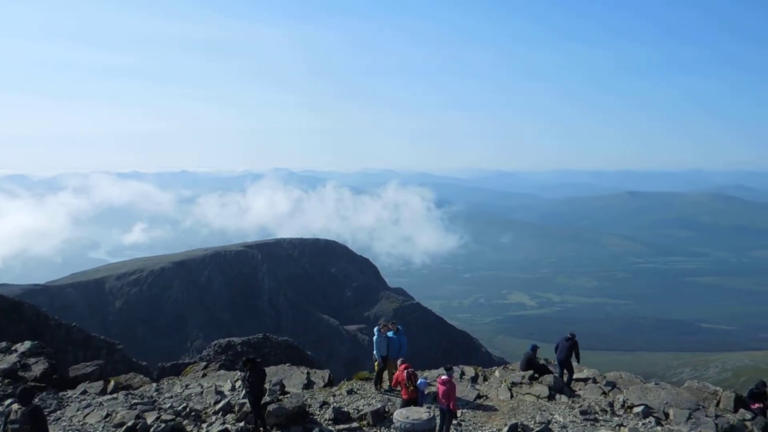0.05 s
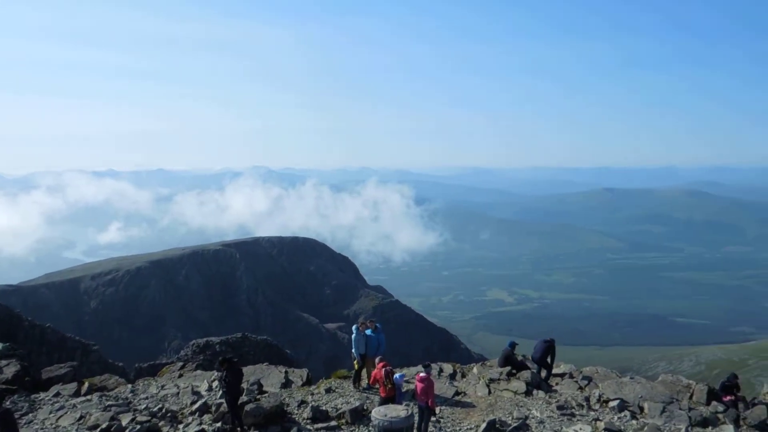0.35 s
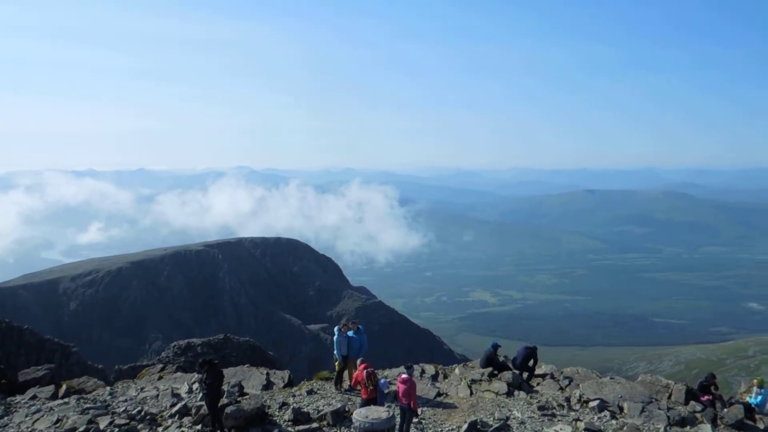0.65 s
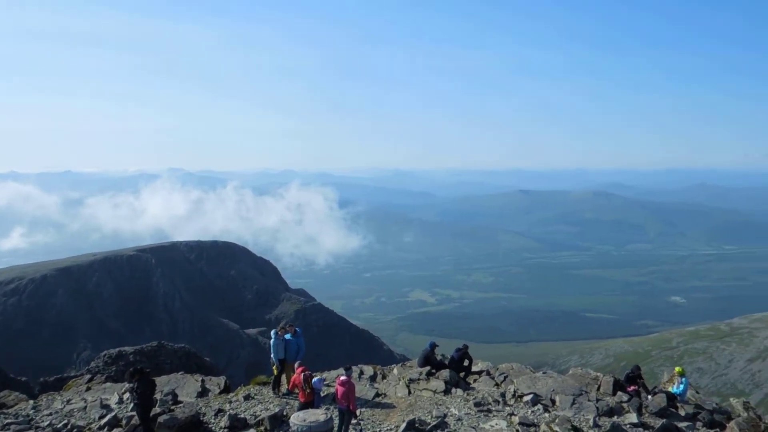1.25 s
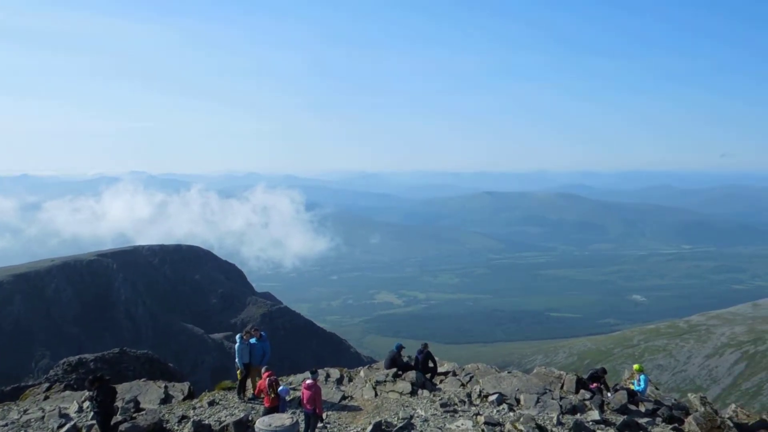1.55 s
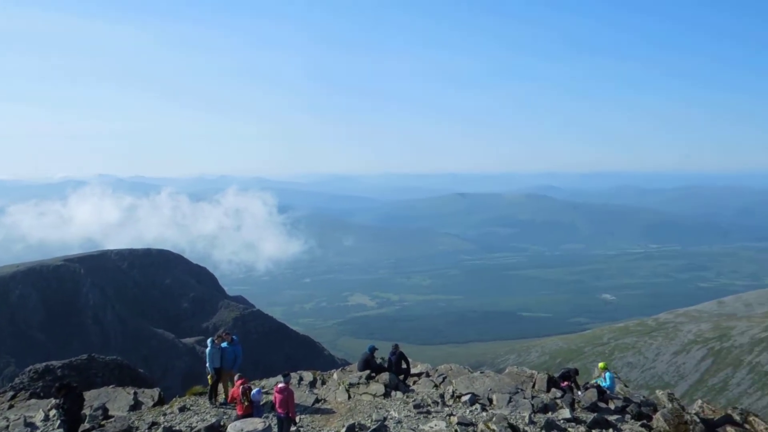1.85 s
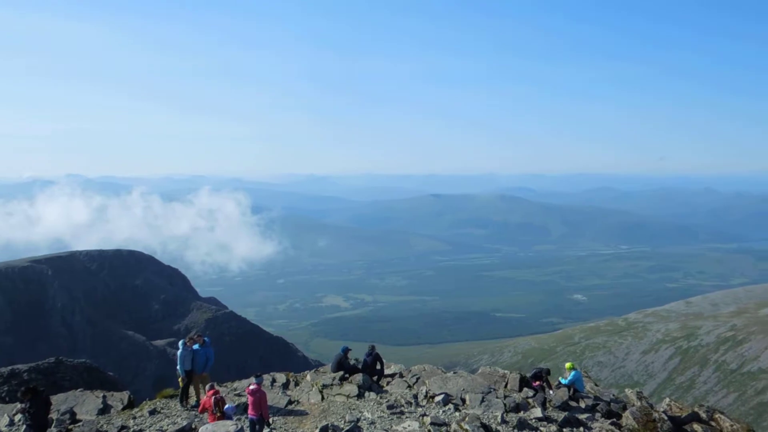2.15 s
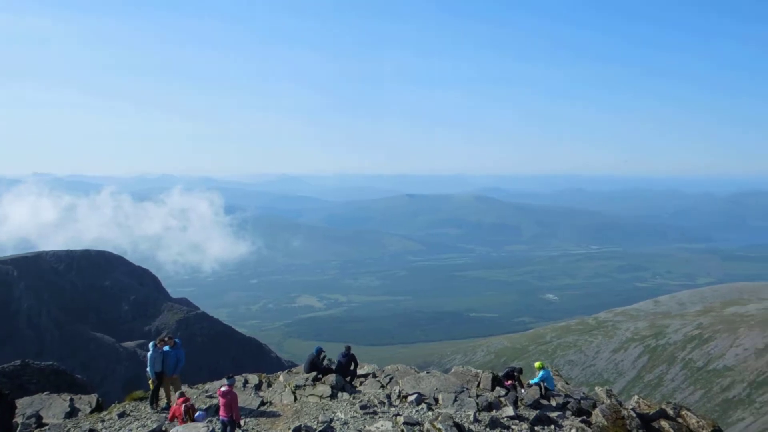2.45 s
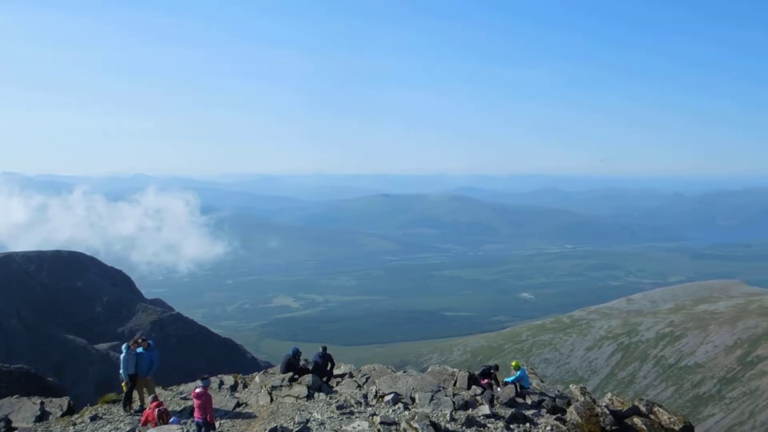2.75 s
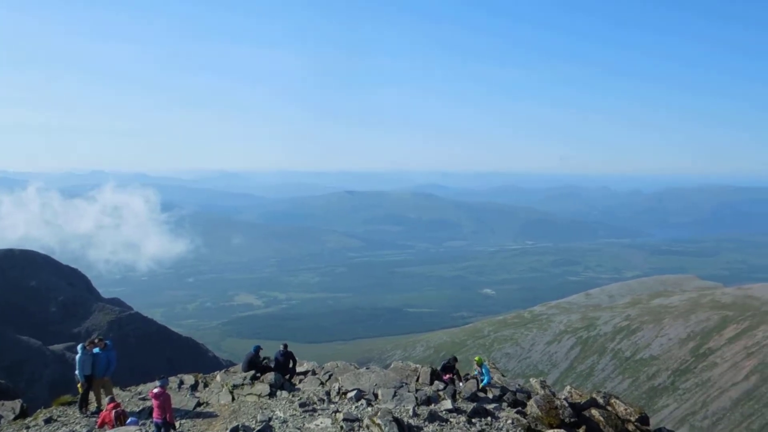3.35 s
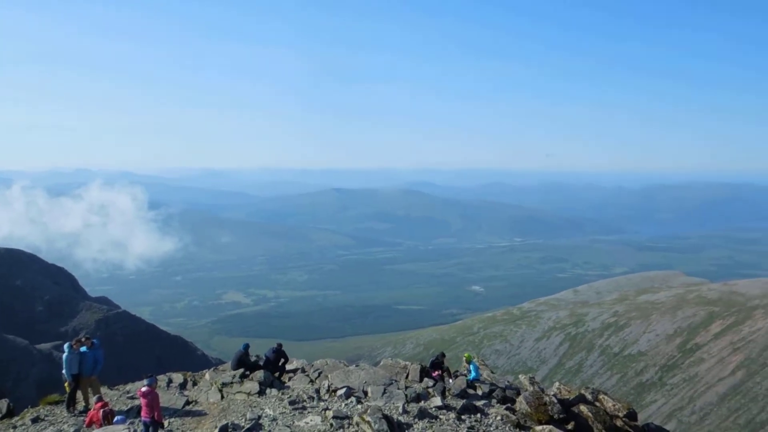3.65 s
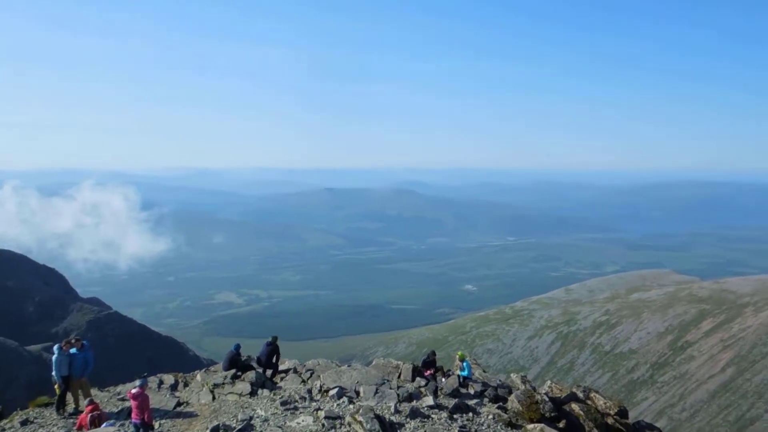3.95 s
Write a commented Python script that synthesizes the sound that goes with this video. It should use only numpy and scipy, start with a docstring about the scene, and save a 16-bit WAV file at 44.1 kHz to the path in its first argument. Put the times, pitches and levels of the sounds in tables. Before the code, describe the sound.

Gusty wind buffets the microphone on an open hilltop over a deep rumble.

```python
"""An open hilltop, where wind buffets the two microphone ports of a slowly panning hand-held camera.
At first single eddies (swirls of air) slap the left port; then the flow tears across it steadily
and reaches the right port in two gusts. Faster flow is louder and brighter.
Under it lie a deep rumble, faint hiss and a few rustles of the hand.
Tiny dry clicks sound in both channels, many at the strongest buffets."""
import sys
import numpy as np
from scipy import signal
from scipy.fft import rfft, irfft, next_fast_len
from scipy.io import wavfile
from scipy.ndimage import uniform_filter1d, minimum_filter1d, map_coordinates

SR = 44100
rng = np.random.default_rng(int(sys.argv[2]) if len(sys.argv) > 2 else 0)


def generate_wav(signal):
    """Clip the signal to [-1, 1] and save it as 16-bit WAV at the path in sys.argv[1]."""
    frames = np.transpose(np.atleast_2d(signal))
    scaled = np.clip(frames, -1, 1) * 32767
    pcm = np.round(scaled).astype(np.int16)
    wavfile.write(sys.argv[1], SR, pcm)


N = 176400

# Table levels are relative; each layer may add its own gain.
# Wind at each port: time_s, level_db, corner_hz (the sound fades above this frequency)
LEFT_WIND = [(0.01, -36, 1090), (0.2, -28.5, 970), (0.35, -31, 830), (0.5, -22.5, 1100),
             (0.585, -23.5, 900), (0.645, -19, 1000), (0.795, -21, 935), (0.97, -24.5, 1040),
             (1.065, -19.5, 1190), (1.1, -45, 860), (1.2, -32, 1190), (1.4, -25.5, 1440),
             (1.55, -32.5, 1090), (1.715, -29.5, 940), (1.76, -13, 1420), (1.84, -12, 1440),
             (1.89, -17, 1970), (2.03, -16.5, 2470), (2.22, -15.5, 2165), (2.45, -19, 2000),
             (2.53, -16.5, 2000), (2.65, -22, 1680), (2.76, -20.5, 1400), (2.83, -19.5, 2100),
             (2.895, -28.5, 1350), (2.94, -22.5, 1250), (3.025, -18, 1520), (3.045, -17, 2140),
             (3.135, -13.5, 1650), (3.165, -16, 2600), (3.22, -19, 2300), (3.45, -18.5, 2450),
             (3.62, -22, 1700), (3.73, -15, 1890), (3.86, -19.5, 2250), (3.98, -16, 2100)]
RIGHT_WIND = [(0.05, -30, 780), (0.45, -36, 800), (0.66, -21, 576), (0.87, -24.5, 675), (1.1, -36.5, 684),
              (1.6, -37.5, 765), (1.9, -29, 860), (2.35, -25, 1150), (2.47, -12, 1300), (2.54, -24.5, 1040),
              (2.6, -15, 1210), (2.75, -10, 1600), (2.88, -14.5, 1350), (2.95, -31, 650),
              (3.13, -30.5, 800), (3.28, -19.5, 1230), (3.55, -16.5, 1170), (3.73, -15, 1400),
              (3.85, -21.5, 940), (3.98, -31.5, 890)]
# Eddies slapping the left port: centre_s, length_s, level_db
LEFT_BUFFETS = [(0.04,0.026,-17.5), (0.083,0.022,-15), (0.137,0.012,-24.5), (0.304,0.051,-26.5),
                (0.378,0.016,-21.5), (0.435,0.036,-19), (0.531,0.02,-9), (0.626,0.021,-17),
                (0.674,0.01,-15), (0.713,0.01,-11), (0.741,0.043,-6), (0.764,0.011,-3.5),
                (0.822,0.027,-18.5), (0.861,0.022,-11.5), (0.908,0.033,-15), (0.954,0.023,-16),
                (1.006,0.036,-17.5), (1.172,0.049,-22), (1.256,0.014,-20.5), (1.485,0.034,-21),
                (1.618,0.04,-23.5), (1.766,0.031,-8), (1.806,0.026,-8), (2.705,0.037,-11),
                (2.928,0.0098,-19)]
# Sharp pressure pops: time_s, peak_db
LEFT_POPS = [(0.078, -14), (0.82, 1), (0.868, 0), (.895, -2.5), (1.017, -5)]
# Rasps where the flow tears hardest: centre_s, level_db
LEFT_RASPS = [(.078, -46), (.535, -49), (0.739, -34), (1.813, -32.5), (1.906, -35.5), (1.987, -33),
              (2.066, -31), (3.05, -39), (3.167, -36), (3.748, -35)]
# Hollow booms at the height of a gust: centre_s, length_s, pitch_hz, level_db
RIGHT_BOOMS = [(2.593, 0.0522, 199.8, -12.5), (2.74, 0.0376, 146.4, -12.5)]
# Loudness of the rumble and the hiss: time_s, level_db
RUMBLE_LEVELS = [(0, -20), (.2, -27), (.43, -20), (.8, -20.5), (1.25, -25.5), (1.68, -19), (2.05, -27),
                 (2.75, -23), (3.1, -26), (3.7, -24.5), (4, -33.5)]
HISS_LEVELS = [(0, -85), (.3, -88.5), (.7, -80), (1.3, -92.5), (1.75, -81), (2.98, -90), (3.25, -85)]
# Tiny dry clicks in both channels: start_s, level_db
DRY_TICKS = [(0.7404, -44), (0.7626, -43), (0.7724, -43), (0.87, -43.5), (0.88, -50), (1.017, -48),
             (1.085, -60), (1.132, -59), (1.415, -61), (1.5848, -49.5), (1.6404, -50.5), (1.693, -53),
             (1.7642, -44), (1.7888, -45), (1.828, -48.5), (2.631, -43.5), (2.737, -49), (3.292, -54)]
# Rustles of the hand: centre_s, length_s, level_db
HAND_RUSTLES = [(.065, .075, -69), (.365, 0.023, -70), (.63, 0.13, -74)]
# Tone of each sound, from bass to treble: frequency_hz, gain_db
LEFT_TONE = [(30, -25), (80, 1.5), (280, -0.5), (700, -0.67), (1500, -1.5), (3000, 0.5), (6000, -7.5)]
RIGHT_TONE = [(30, 4), (80, 8.5), (150, 6), (400, 3.5), (1000, -1.5), (2000, 6), (5000, 2.5), (12000, 9)]
CRACKLE_TONE = [(500, -19.5), (2000, 15), (3500, 8), (6000, -7), (10000, -20), (14000, -26)]
RUMBLE_TONE = [(8, -9), (20, 7), (65, 0), (100, -9), (170, -20.5), (300, -48), (2000, -75.5)]
TICK_TONE = [(3000, 2.5), (7000, -6.5), (12000, -6), (15000, -17.5)]
HISS_TONE = [(1000, 8.5), (2000, 13.5), (4000, 2.5), (8000, -5.5), (12000, -2.5), (15000, -12.5)]

FLUTTER_HZ, GRAIN_HZ = 64.47, 415.2  # how often large and small eddies change the level
PORT_HZ, PORT_WIDTH_HZ, LEFT_RING_DB = 1070, 380, 13  # the hollow ring of a port
SLOW_HZ = 1500  # a corner below this counts as slow flow
TIME = np.arange(N) / SR


def wind(flow, tone, steepness, ring_db, flutter_db, grain_db, brighten, crackle_db):
    """Eddies make the wind louder and brighter together; slow flow flutters, fast flow crackles."""
    level_db, corner_hz = curves(flow)
    eddies = wobble(FLUTTER_HZ) * np.minimum(1200 / corner_hz, 1) ** 3
    grain = unit(amp(grain_db * wobble(GRAIN_HZ)))
    rush = turbulence(tone, corner_hz * np.exp(brighten * eddies), steepness, ring_db)
    roar = amp(level_db + flutter_db * eddies) * rush
    tearing = crackle(level_db + crackle_db + 28 * np.log2(corner_hz / SLOW_HZ), spread_db=47)
    return grain * roar + grain ** 2 * tearing


def turbulence(tone, corner_hz, steepness, ring_db):
    """Churning air: noise that fades above a moving corner. Slow flow is duller and rings the port."""
    hz, frame_s, spectrum = signal.stft(noise(tone), SR, nperseg=256, noverlap=192)
    hz = hz[:, None]
    corner = np.maximum(np.interp(frame_s, TIME, corner_hz), 100)
    slow = 1 / (1 + (corner / SLOW_HZ) ** 6)
    ring_hz = PORT_HZ * np.exp(0.07 * np.interp(frame_s, TIME, wobble(16)))  # the pitch wanders
    ring = 1 / (1 + (2 * (hz - ring_hz) / PORT_WIDTH_HZ) ** 2)
    shape = (1 + (hz / corner) ** 2) ** (-(steepness + 1.5 * slow) / 2)
    shape *= amp(ring_db * slow * ring)
    power = tone_gain(tone, hz) ** 2
    shape /= np.sqrt((power * shape ** 2).sum(0) / power.sum())  # keep the level steady
    return signal.istft(spectrum * shape, SR, nperseg=256, noverlap=192)[1][:N]


def buffets(grain_db, gain_db, full_hz=1757, hz_per_db=12.5):
    """Single eddies slap the left port, each a short, rough swell; weaker ones are duller."""
    power = sum(amp(db) ** 2 * np.exp(-np.abs(2 * (TIME - s) / length) ** 3)
                for s, length, db in LEFT_BUFFETS)
    corner_hz, = curves([(s, full_hz + hz_per_db * db) for s, _, db in LEFT_BUFFETS])
    grain = unit(amp(grain_db * wobble(GRAIN_HZ)))
    rush = turbulence(LEFT_TONE, corner_hz, steepness=6.01, ring_db=LEFT_RING_DB)
    return amp(gain_db) * np.sqrt(power) * grain * rush


def pops(width_s=0.00051):
    """A tight eddy gives one push of pressure and, 3 ms later, a softer pull."""
    out = np.zeros(N)
    for s, db in LEFT_POPS:
        push = bump((TIME - s) / width_s)
        pull = 0.32 * bump((TIME - s - 0.003) / (2 * width_s))
        out += amp(db) * (push - pull)
    return out


def booms():
    """Eddies peel off evenly for a moment and give a short hollow note that sags."""
    out = np.zeros(N)
    for s, length, hz, db in RIGHT_BOOMS:
        progress = np.clip((TIME - s) / length, -2, 2)
        pitch_hz = hz * np.exp(0.15 * (wobble(80) - progress))
        note = np.sqrt(2) * np.sin(2 * np.pi * np.cumsum(pitch_hz) / SR)
        out += amp(db) * bump(2 * progress) * note
    return out


def rasps(width_s=0.0062):
    """The hardest tearing of the flow gives short bursts of coarse crackle."""
    power = sum(amp(db) ** 2 * bump((TIME - s) / width_s) for s, db in LEFT_RASPS)
    return crackle(10 * np.log10(power + 1e-14), spread_db=69)


def crackle(level_db, spread_db, clicks_per_s=1900):
    """Fast flow tears at the edge of the port and spits tiny clicks."""
    clicks = (rng.random(N) < clicks_per_s / SR) * np.sign(rng.standard_normal(N))
    clicks *= amp(-spread_db * rng.random(N))
    return amp(level_db) * unit(filtered(clicks, lambda hz: tone_gain(CRACKLE_TONE, hz)))


def rumble(gain_db):
    """Large slow eddies press on both ports, a little harder on the right."""
    level_db, = curves(RUMBLE_LEVELS)
    side_db = np.array([[-1], [1]])
    return amp(gain_db + level_db + side_db) * stereo_noise(RUMBLE_TONE, shared=0.64)


def ticks(gain_db, fade_s=0.0069):
    """Tiny dry clicks in both channels, many at the strongest buffets."""
    out, t = np.zeros(N + SR), np.arange(SR // 20) / SR
    for s, db in DRY_TICKS:
        tick = amp(db + gain_db - 60 * t / fade_s) * rng.standard_normal(len(t))
        out[round(s * SR):][:len(t)] += tick
    return filtered(out[:N], lambda hz: tone_gain(TICK_TONE, hz))


def rustles(centre_hz=10800, width_hz=5900):
    """A hand shifts on the camera body: brief, thin, high rustles."""
    swell = sum(amp(db) * bump(2 * (TIME - s) / length) for s, length, db in HAND_RUSTLES)
    rub = filtered(rng.standard_normal(N), lambda hz: bump((hz - centre_hz) / width_hz))
    return swell * unit(rub)


def hiss(gain_db):
    """Faint hiss, whose level sinks and rises."""
    level_db, = curves(HISS_LEVELS)
    return amp(level_db + gain_db) * stereo_noise(HISS_TONE, shared=0.75)


def amp(db):
    """Turn decibels into a gain."""
    return 10 ** (np.asarray(db) / 20)


def unit(x):
    """Scale to an average (rms) level of 1."""
    return x / np.sqrt(np.mean(x ** 2) + 1e-20)


def bump(x):
    """A bell-shaped curve, highest at x = 0."""
    return np.exp(-np.minimum(x * x, 100))


def tone_gain(tone, hz):
    """The gain a tone table gives at each frequency."""
    points_hz, db = np.transpose(tone)
    return amp(np.interp(np.log(hz + 1), np.log(points_hz + 1), db))


def curves(rows):
    """One value per sample for each column after the time."""
    time_s, *columns = np.transpose(rows)
    return [np.interp(TIME, time_s, column) for column in columns]


def wobble(rate):
    """A smooth curve through `rate` random points a second."""
    points = rng.standard_normal(N // 16)
    return map_coordinates(points, [TIME * rate], mode="wrap")


def filtered(x, response):
    """Scale each frequency in x by response(hz)."""
    size = next_fast_len(N + SR // 4)
    hz = np.fft.rfftfreq(size, 1 / SR)
    return irfft(rfft(x, size) * response(hz), size)[..., :N]


def noise(tone):
    """Noise with the given tone, at level 1."""
    return unit(filtered(rng.standard_normal(N), lambda hz: tone_gain(tone, hz)))


def stereo_noise(tone, shared):
    """Noise at both ports, with a share of its power common to the two."""
    return np.sqrt(shared) * noise(tone) + np.sqrt(1 - shared) * np.array([noise(tone), noise(tone)])


def scene():
    """Each port has its own wind; rumble, hiss, ticks and rustles are on both."""
    left = amp(0.5) * wind(LEFT_WIND, LEFT_TONE, steepness=6.09, ring_db=LEFT_RING_DB,
                           flutter_db=2.5, grain_db=2.5, brighten=0.24, crackle_db=-46)
    left += buffets(grain_db=4, gain_db=-0.7) + pops() + rasps()
    right = wind(RIGHT_WIND, RIGHT_TONE, steepness=5.68, ring_db=3,
                 flutter_db=2.5, grain_db=3.5, brighten=0.18, crackle_db=-36)
    right += booms()
    background = rumble(gain_db=0.5) + hiss(gain_db=17) + ticks(gain_db=9) + rustles()
    return np.array([left, right]) + background


def record(dry):
    """A fast limiter turns down the strongest peaks; a filter cuts the highest treble."""
    ceiling, top_hz = 0.98, 14400
    needed = np.minimum(ceiling / (np.abs(dry) + 1e-9), 1)
    held = minimum_filter1d(needed, size=61, axis=1)
    gain = uniform_filter1d(held, size=61, axis=1)
    low_pass = signal.ellip(10, 0.1, 90, top_hz, fs=SR, output="sos")
    return signal.sosfilt(low_pass, dry * gain)


dry = scene()
out = record(dry)
generate_wav(out)
```